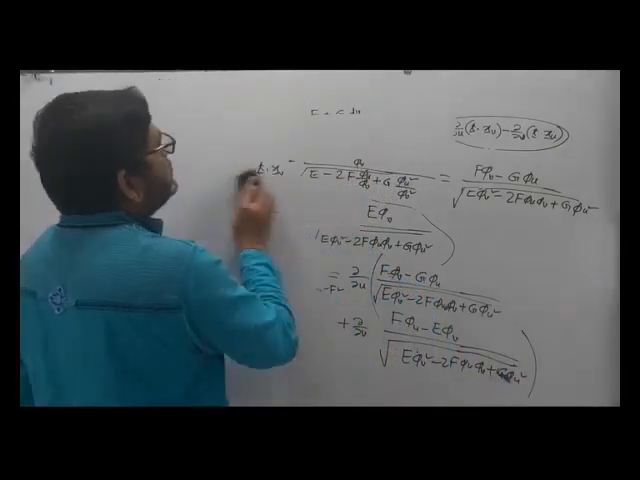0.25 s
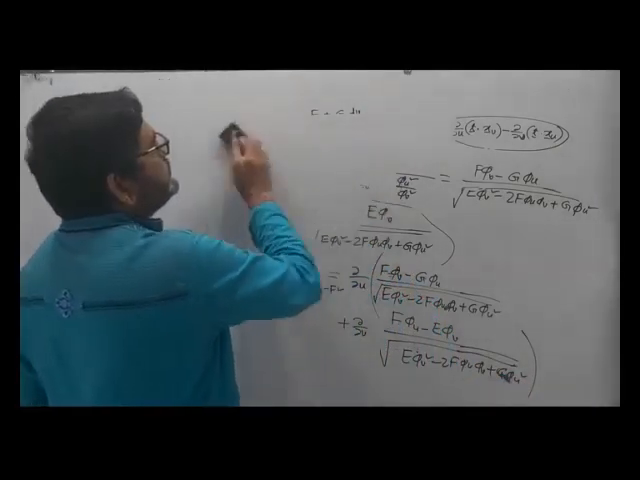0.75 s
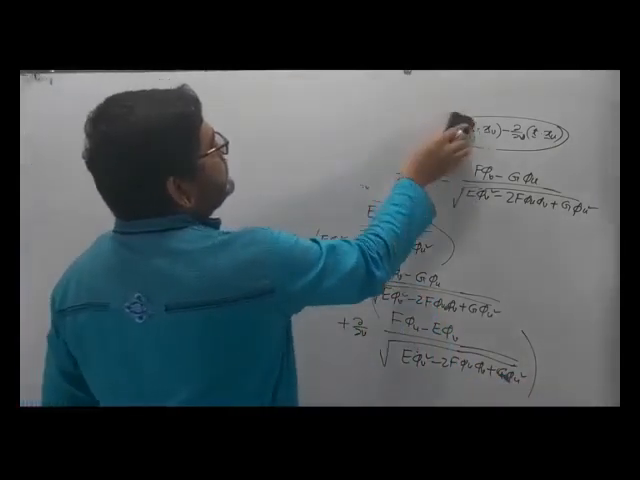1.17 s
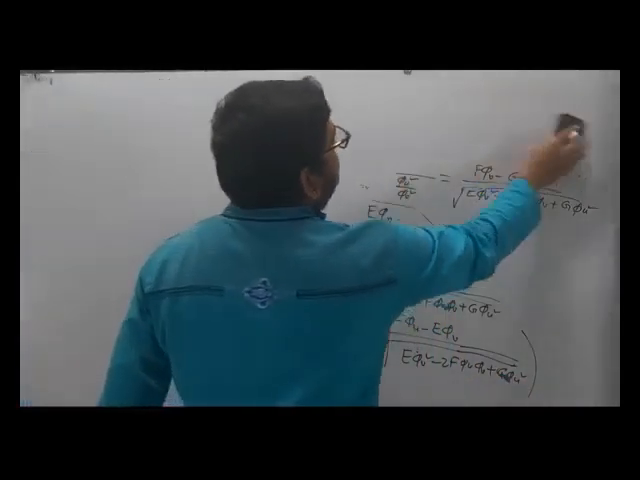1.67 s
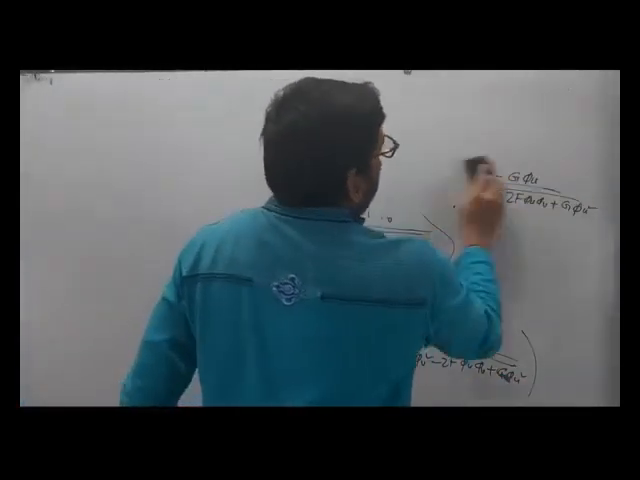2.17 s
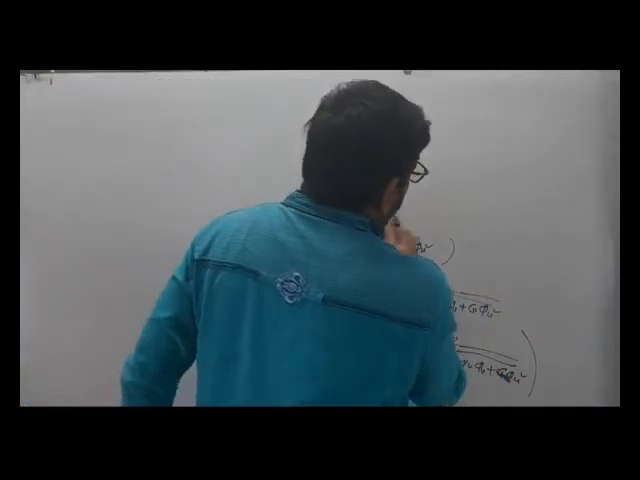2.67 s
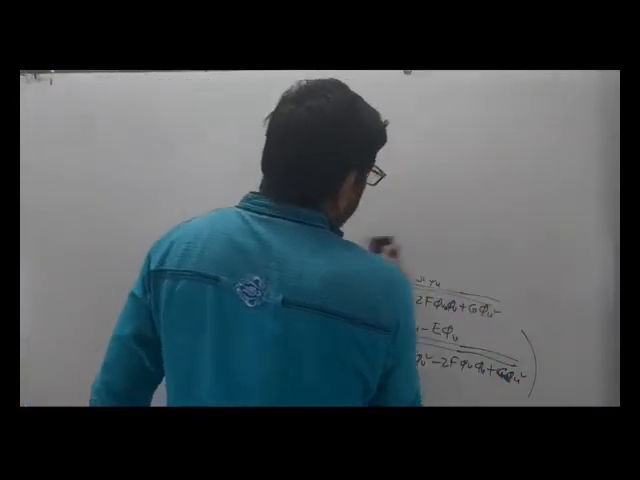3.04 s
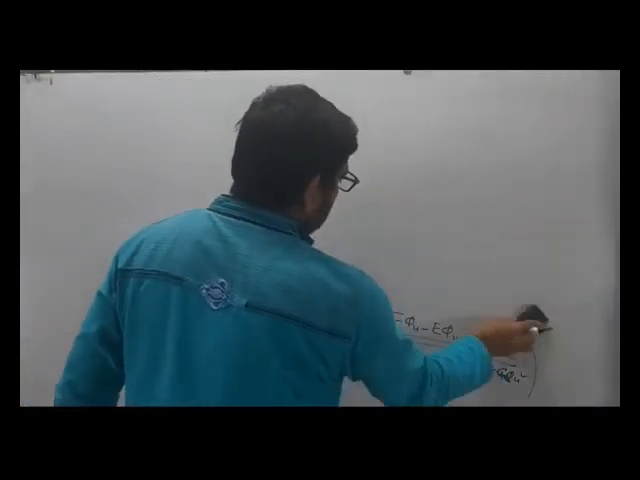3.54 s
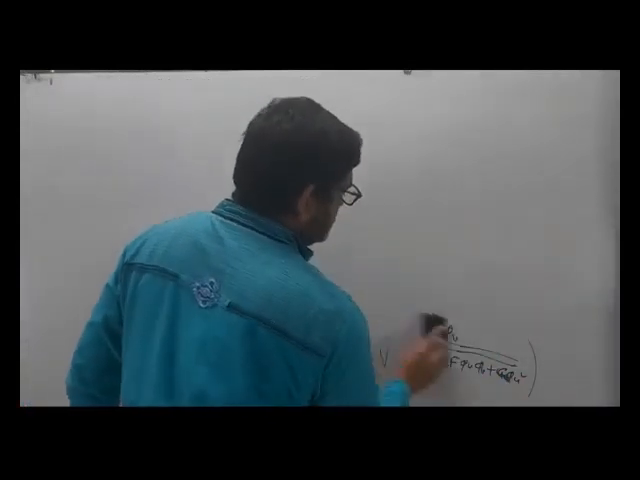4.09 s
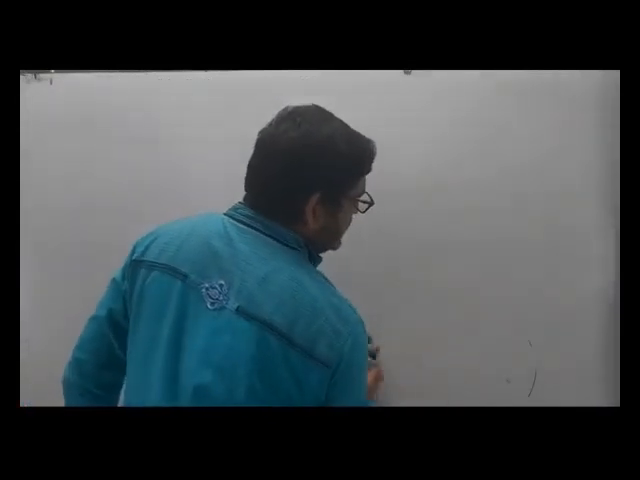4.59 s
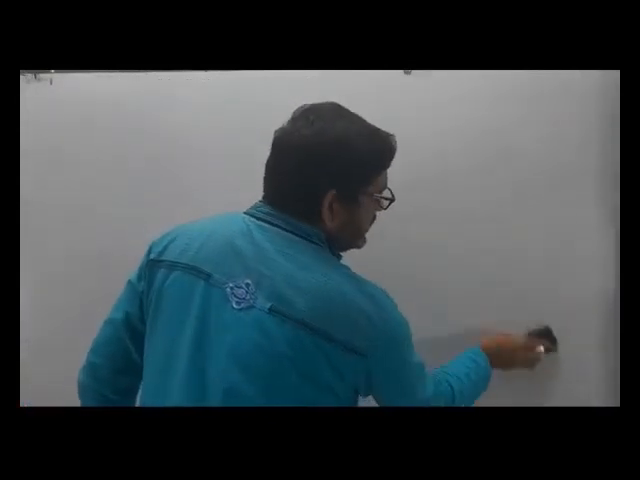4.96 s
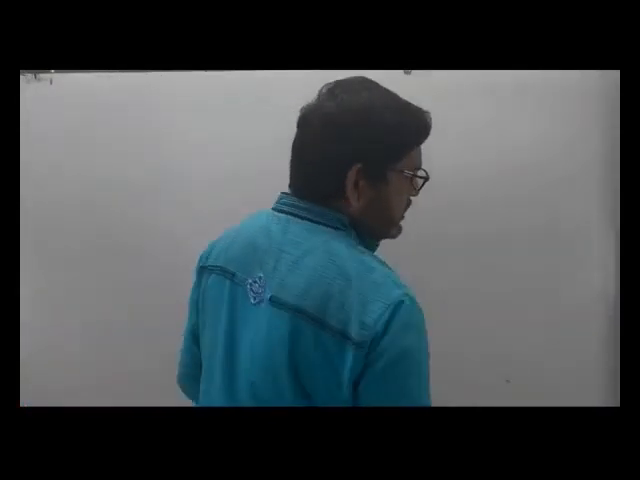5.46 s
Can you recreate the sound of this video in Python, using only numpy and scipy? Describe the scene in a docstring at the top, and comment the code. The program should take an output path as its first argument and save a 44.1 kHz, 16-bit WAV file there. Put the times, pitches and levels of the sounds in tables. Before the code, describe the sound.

An eraser wipes a whiteboard in quick, dry, hissing strokes, with a few light knocks over a low room hum.

```python
"""Erasing a whiteboard

A small room with a mains hum and a low rush of air, heard through one microphone, in mono.
A felt eraser, dry and close, wipes back and forth about three strokes a second. The felt hisses,
the shell scrapes and now and then knocks or ticks, and the panel rumbles among low thumps.
At the end the felt eases off and a small hard object is tapped."""
import sys
import numpy as np
from scipy import signal
from scipy.fft import rfft, irfft
from scipy.io import wavfile
from scipy.ndimage import uniform_filter1d

SR = 44100
rng = np.random.default_rng(int(sys.argv[2]) if len(sys.argv) > 2 else 0)


def output_pcm(signal):
    """Save a mono or channel-first signal as 16-bit PCM at the path in sys.argv[1].

    Samples are clipped to [-1, 1] before scaling.
    """
    pcm = np.clip(np.atleast_2d(signal).T, -1, 1) * 32767
    wavfile.write(sys.argv[1], SR, np.round(pcm).astype(np.int16))


N = 252291
TIME = np.arange(N) / SR


def gain_of(db):
    """Decibels to a factor."""
    return 10 ** (np.asarray(db) / 20)


def unit_rms(x):
    """Scales to rms 1."""
    return x / np.sqrt(np.mean(x ** 2) + 1e-20)


def coloured(x, spectrum):
    """Filters x by a curve on a log-frequency axis, falling away past its ends; rms 1."""
    hz, db = np.transpose(spectrum)
    bins = np.fft.rfftfreq(N, 1 / SR) + 1
    shape_db = np.interp(np.log(bins), np.log(hz), db)
    octaves_outside = abs(np.log2(bins / np.clip(bins, hz[0], hz[-1])))
    return unit_rms(irfft(rfft(x) * gain_of(shape_db - 20 * octaves_outside), N))


def drift(per_s):
    """A random curve of rms 1, changing up to about per_s times a second."""
    bins = np.fft.rfftfreq(N, 1 / SR)
    return unit_rms(irfft(rfft(rng.standard_normal(N)) * np.exp(-(bins / per_s) ** 2), N))


def resonate(x, hz, width_hz):
    """A resonance that follows the curve hz, applied twice for steep skirts; rms 1."""
    carrier = np.exp(2j * np.pi * np.cumsum(hz * np.ones(N)) / SR)
    pole = np.exp(-np.pi * width_hz / SR)
    return unit_rms((carrier * signal.lfilter([1], [1, -2 * pole, pole * pole], x / carrier)).real)


def blows(rows, modes, contact_s):
    """Short blows ring a set of modes, a little differently at each spot; a longer contact is duller."""
    out, t = np.zeros(N), np.arange(SR // 10) / SR
    hz, db, t60 = np.transpose(modes)[:, :, None]
    for start_s, peak_db in rows:
        spot_hz = hz * (1 + 0.04 * rng.standard_normal(hz.shape))
        decay = gain_of(db) * np.exp(-np.log(1000) * t / t60)
        ring = (decay * np.sin(2 * np.pi * spot_hz * t)).sum(0)
        ring *= 1 - np.exp(-(t / contact_s) ** 2)
        span = out[round(start_s * SR):][:len(t)]
        span += gain_of(peak_db) * ring[:len(span)] / abs(ring).max()
    return out


def room(x, t60, wet_db):
    """The direct sound, then a short diffuse tail off the nearby walls."""
    t = np.arange(SR // 2) / SR
    tail = rng.standard_normal(len(t)) * np.exp(-np.log(1000) * t / t60) * (t > .004)
    return x + gain_of(wet_db) * signal.fftconvolve(x, tail / np.linalg.norm(tail))[:N]


# Mains hum at the microphone: (frequency [Hz], level [dB])
HUM_PARTIALS = [(48.5, -53), (97.1, -49.5), (146.3, -51.5), (194.2, -58.5), (388, -67.5), (734, -75.5)]
# Air all round the room: (frequency [Hz], relative level [dB])
AIR_SPECTRUM = [(15, -22), (32, -42), (50, -8.5), (125, 1.5), (200, -5.5), (300, -10), (480, -17),
                (750, -19), (1200, -26.5), (1900, -28), (3000, -43), (5000, -42), (9800, -43), (12500, -54)]


def room_tone():
    """A mains hum wavers in level and phase over a low rush of air."""
    hum = np.zeros(N)
    for hz, db in HUM_PARTIALS:
        amplitude = np.sqrt(2) * gain_of(db + 2 * drift(3.1))
        cycles = hz * TIME + rng.random() + 0.081 * drift(5.3)
        hum += amplitude * np.sin(2 * np.pi * cycles)
    return hum + gain_of(-48.5) * coloured(rng.standard_normal(N), AIR_SPECTRUM)


# Rumble under the hand's weight: (time [s], relative level [dB])
RUMBLE_LEVELS = [(0.0, -49), (0.3, -49), (1.1, -48), (1.45, -51.5), (1.85, -48.5), (2.5, -50), (2.85, -48),
                 (3.5, -50.5), (3.85, -49), (4.15, -50.5), (5.05, -49), (5.35, -52.5), (5.7, -53.5)]
# The panel behind the eraser: (frequency [Hz], relative level [dB])
PANEL_SPECTRUM = [(30, -27), (70, 0.5), (125, 1.5), (230, 1), (320, -3.5), (480, -13.5), (900, -14),
                  (1500, -20), (3000, -24.5)]


def panel_rumble():
    """The rubbing shakes the heavy panel, and its lowest mode wobbles under the hand."""
    level_db = np.interp(TIME, *np.transpose(RUMBLE_LEVELS))
    rumble = gain_of(level_db - 0.5) * coloured(rng.standard_normal(N), PANEL_SPECTRUM)
    cycles = 51 * TIME + 0.14 * drift(13)
    wobble = np.sqrt(2) * np.sin(2 * np.pi * cycles)
    wobble += 0.25 * resonate(rng.standard_normal(N), hz=52, width_hz=46)
    wobble_db = level_db - 4 + 2 * drift(4)
    return rumble + gain_of(wobble_db) * wobble


# Low thumps and booms; the first is a brief swell of the hum:
# (centre time [s], level [dB], pitch [Hz], half-width [s])
LOW_THUMPS = [(.1, -37.5, 99, 0.11), (0.345, -41, 48.7, 0.1), (.63, -47, 52, 0.035),
              (0.948, -30.5, 90.5, 0.0031), (1.134, -39, 49.3, 0.041), (2.773, -42.5, 247, 0.021),
              (2.89, -35.5, 202, 0.011), (3.186, -28.5, 90, 0.0081), (3.212, -30, 54, 0.023),
              (3.882, -43, 51.6, .06), (3.909, -25.5, 114, 0.0044), (5.4656, -24, 88.5, 0.006)]


def low_thumps():
    """Each is a brief low tone that swells and dies away."""
    out = np.zeros(N)
    for centre_s, db, hz, half_width_s in LOW_THUMPS:
        t = TIME - centre_s
        out -= gain_of(db) * np.exp(-(t / half_width_s) ** 2) * np.sin(2 * np.pi * hz * t)
    return out


# A small hard object, tapped at the end: (time [s], direct peak level [dB])
CLINK_HITS = [(5.713, -35.5)]
# Its ring: (frequency [Hz], relative level [dB], t60 [s])
OBJECT_MODES = [(990, -2, 0.011), (2350, -2, 0.023), (3390, -10, 0.022), (5200, -10, 0.014),
                (5730, -8, .01), (10200, -10, .01)]


def clink():
    """A tap rings the hard object briefly."""
    return blows(CLINK_HITS, OBJECT_MODES, contact_s=0.0005)


# Sharp plastic ticks: (time [s], direct peak level [dB])
TICK_HITS = [(3.9662, -28.5), (4.504, -33), (4.609, -40), (5.206, -50), (5.525, -58)]
# The plastic's ring: (frequency [Hz], relative level [dB], t60 [s])
PLASTIC_MODES = [(405, 3, 0.0077), (1440, 0.5, 0.0058), (3780, -2, .005), (4220, -1, .005),
                 (6660, -2, 0.0044), (9300, -0.5, 0.0045)]


def ticks():
    """Very short contacts ring the plastic brightly."""
    return blows(TICK_HITS, PLASTIC_MODES, contact_s=0.0003)


# The eraser knocking on the board: (time [s], direct peak level [dB])
KNOCK_HITS = [(1.6508, -34), (1.660, -44), (1.668, -43), (1.783, -50), (2.2445, -35.5), (2.255, -44),
              (2.355, -47), (2.770, -43), (4.784, -43), (5.4426, -36), (5.525, -51)]
# A knock's ring: (frequency [Hz], relative level [dB], t60 [s])
KNOCK_RING = [(650, -16, 0.02), (1040, -13.5, 0.0063), (1310, -2.5, 0.0056), (1690, -9, 0.0068),
              (1980, -16, 0.0045)]


def knocks():
    """The shell strikes the board; the longer contact gives a duller sound."""
    return blows(KNOCK_HITS, KNOCK_RING, contact_s=0.0009)


# Scrape at the board's face: (frequency [Hz], relative level [dB])
SCRAPE_SPECTRUM = [(500, -6), (1000, -7.5), (1500, -1.5), (2050, -2), (2600, -1.5), (4300, -4.5),
                   (5300, -3.5), (7000, -12.5)]


def board_scrape(force):
    """A dull scrape follows the force of the whole stroke."""
    return gain_of(5) * force * coloured(rng.standard_normal(N), SCRAPE_SPECTRUM)


def fibres(per_s, spread_db):
    """Countless tiny slips of felt fibres, uneven in size."""
    size = gain_of(spread_db * np.minimum(rng.exponential(1, N), 4))
    return size * rng.standard_normal(N) * (rng.random(N) < per_s / SR)


def shell(lower_gain, upper_gain, upper_hz, speed):
    """Slipping fibres ring two shell resonances; the upper one moves as the hand tilts the eraser."""
    lower = resonate(fibres(per_s=15000, spread_db=1.5), 2740 * (1 + .03 * drift(8)), width_hz=800)
    tilted_hz = uniform_filter1d(upper_hz, round(0.085 * SR))  # each new tilt takes 85 ms
    sag = 0.077 * (1 - speed)  # the pitch sinks as the hand slows
    rocking = 0.039 * drift(13)
    upper = resonate(fibres(per_s=15000, spread_db=-1), tilted_hz * (1 - sag + rocking), width_hz=1500)
    return gain_of(1.5) * lower_gain * lower + gain_of(-0.7) * upper_gain * upper


# The felt close up, its hiss and its finer sizzle: (frequency [Hz], relative level [dB])
HISS_SPECTRUM = [(1000, -9), (3000, -14), (5200, 0.5), (7300, 2.5), (9500, -5.5), (11500, -14.5),
                 (13000, -11), (15700, -20)]
SIZZLE_SPECTRUM = [(5500, -41), (7300, -8.5), (8500, -1), (9600, 0.5), (10500, -2.5), (11700, -9.5),
                   (13000, -18), (15700, -31)]


def felt(hiss_gain, sizzle_gain):
    """Dense fibre slips merge into a hiss with a brighter sizzle above it."""
    hiss = coloured(fibres(per_s=22000, spread_db=1), HISS_SPECTRUM)
    sizzle = coloured(fibres(per_s=24000, spread_db=-0.5), SIZZLE_SPECTRUM)
    return gain_of(0.5) * hiss_gain * hiss + gain_of(0.35) * sizzle_gain * sizzle


def arch(progress, crest):
    """Rises from 0 at the start of a stroke to 1 at its crest and falls to 0 at its end."""
    return np.sin(np.pi / 2 * np.minimum(progress / crest, (1 - progress) / (1 - crest)))


# Strokes across the board, each lasting until the next; levels are relative:
# (start [s], drag in the turn before [dB], fastest point [0-1], hardest point [0-1],
#  lower resonance [dB], upper resonance [dB], hiss [dB], sizzle [dB], upper base pitch [Hz])
ERASER_STROKES = [(-0.031, 10, 0.76, 0.53, -61.5, -58, -60, -53.0, 4050),
                  (0.191, 4, 0.13, 0.7, -63, -53, -59, -54, 3850),
                  (0.381, 8, 0.57, 0.42, -59.5, -60.5, -60, -54.0, 4080),
                  (0.639, 1, 0.22, 0.77, -60.5, -59.5, -59.0, -58.0, 4200),
                  (0.892, 0, 0.59, 0.43, -57.5, -72, -59, -56.5, 3400),
                  (1.221, 1.5, 0.22, 0.7, -62, -66.5, -70, -64.5, 4080),
                  (1.445, -1, 0.55, 0.32, -67, -57.5, -62.5, -54.5, 3180),
                  (1.796, 0.5, 0.53, 0.86, -64, -58, -60.5, -55, 3840),
                  (2.061, 5, 0.63, 0.53, -58, -65, -61.5, -51.5, 3770),
                  (2.336, 1.5, 0.44, 0.82, -62.5, -54.5, -57.5, -51.0, 4100),
                  (2.622, 2.5, 0.68, 0.43, -62.5, -60.5, -61.5, -55, 3910),
                  (2.94, -0.5, 0.2, 0.78, -59, -55.5, -64, -56.0, 3800),
                  (3.226, 5.5, 0.67, 0.42, -68, -58, -64, -53.5, 3920),
                  (3.563, -2, 0.48, 0.9, -65.5, -54.5, -65, -52.5, 4000),
                  (3.87, 8, 0.3, 0.1, -78, -71, -72, -64, 3680),
                  (4.019, 7.5, 0.6, 0.45, -78, -57.5, -60, -56, 3760),
                  (4.345, -5.5, 0.4, 0.84, -67, -55, -60.5, -56, 3620),
                  (4.622, 0, 0.71, 0.34, -78, -62.5, -59.5, -56, 4040),
                  (4.877, 0.5, 0.37, 0.87, -72.0, -62, -72, -55.5, 4120)]
STOP_S, LIFT_S = 5.23, (4.94, 5.68)  # the last stroke ends; the span in which the felt eases off


def eraser():
    """In each stroke, pressure drives hiss and lower resonance, speed the sizzle, bite the upper one."""
    strokes = np.array(ERASER_STROKES)
    starts_s, drag_db = strokes.T[:2]
    position = np.interp(TIME, np.append(starts_s, STOP_S), np.arange(len(strokes) + 1))
    stroke = np.minimum(position.astype(int), len(strokes) - 1)
    progress = position - stroke
    fastest, hardest, lower_db, upper_db, hiss_db, sizzle_db, upper_hz = strokes[stroke, 2:].T
    speed, pressure = arch(progress, fastest), arch(progress, hardest)
    bite = arch(progress, hardest + 0.44 * (fastest - hardest))  # the eraser's edge digs in
    # The hand loops round at each turn, so a little drag remains while the felt touches.
    drag = gain_of(np.interp(TIME, starts_s, drag_db))
    contact = np.interp(TIME, LIFT_S, [1, 0])
    lower_gain = gain_of(lower_db) * pressure ** 2.3 + gain_of(-78.5) * contact * drag
    upper_gain = gain_of(upper_db) * bite ** 2.3 + gain_of(-69.5) * contact * drag
    hiss_gain = gain_of(hiss_db) * pressure ** 0.98 + gain_of(-70.5) * contact * drag
    sizzle_gain = gain_of(sizzle_db) * speed ** 2.54 + gain_of(-67.5) * contact * drag ** 0.27
    force = (lower_gain * upper_gain * hiss_gain * sizzle_gain) ** 0.25
    uneven_grip = gain_of(0.5 * drift(50))
    ringing = shell(lower_gain, upper_gain, upper_hz, speed)
    return uneven_grip * (ringing + board_scrape(force) + felt(hiss_gain, sizzle_gain))


def scene():
    """One microphone feeds both channels; only knocks, ticks and clink carry the room's tail."""
    dull_hits = room(knocks(), t60=0.15, wet_db=-6)
    bright_hits = room(ticks() + clink(), t60=0.19, wet_db=-4)
    mono = eraser() + panel_rumble() + low_thumps() + dull_hits + bright_hits + room_tone()
    return np.array([mono, mono])


def record(dry):
    """The recorder cuts off steeply at 15750 Hz."""
    lowpass = signal.firwin(511, 15750, window=("kaiser", 9), fs=SR)
    return signal.oaconvolve(dry, lowpass[None], "same")


dry = scene()
out = record(dry)
output_pcm(out)
```